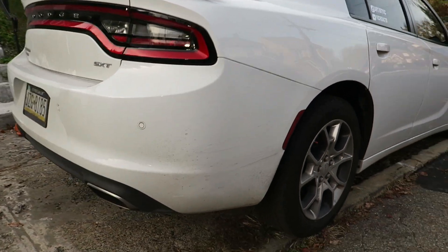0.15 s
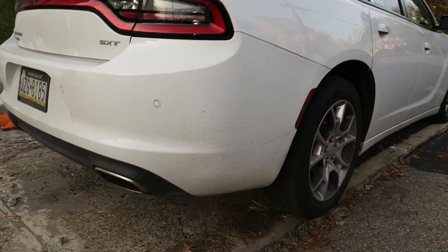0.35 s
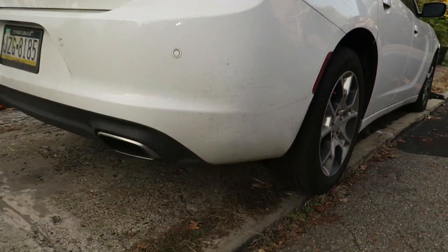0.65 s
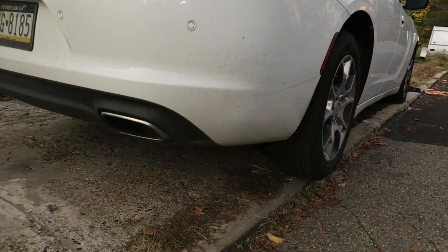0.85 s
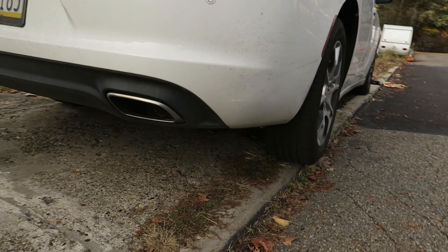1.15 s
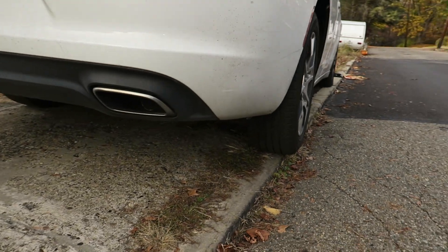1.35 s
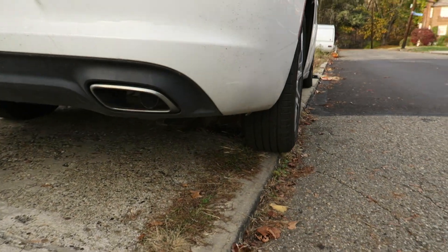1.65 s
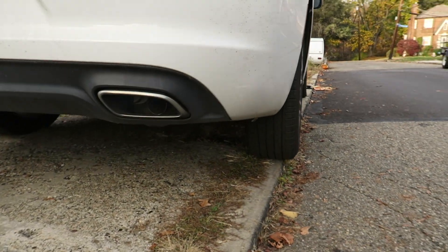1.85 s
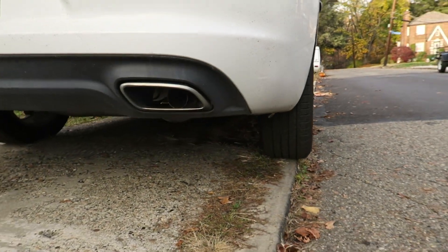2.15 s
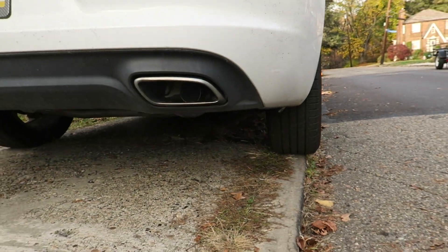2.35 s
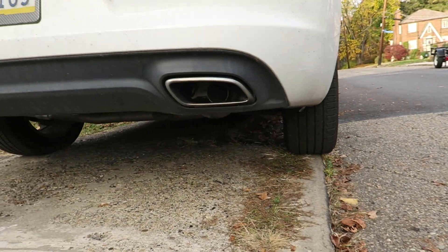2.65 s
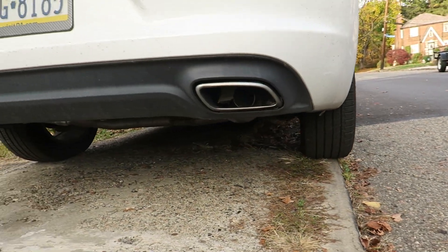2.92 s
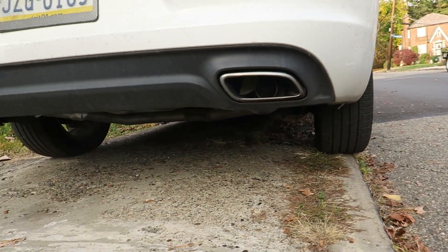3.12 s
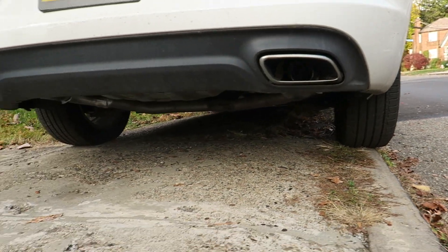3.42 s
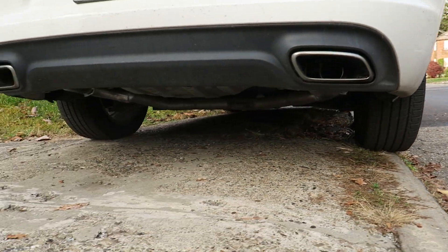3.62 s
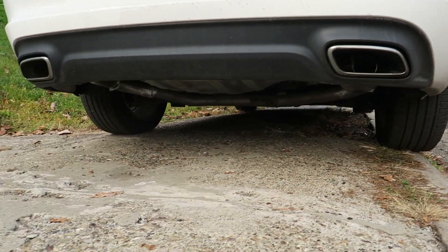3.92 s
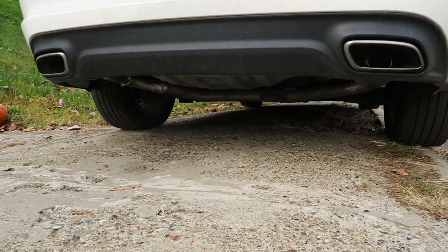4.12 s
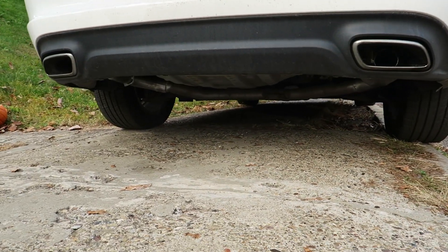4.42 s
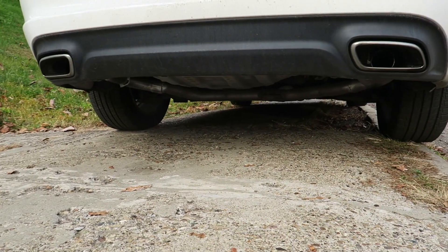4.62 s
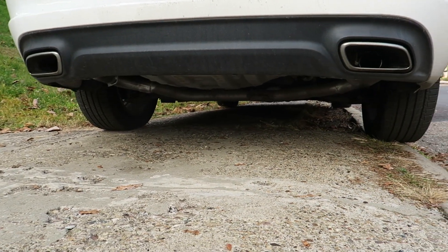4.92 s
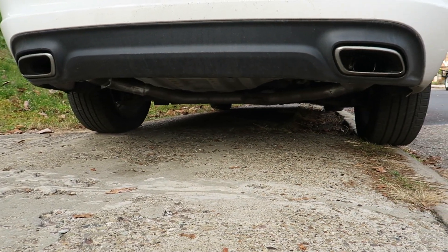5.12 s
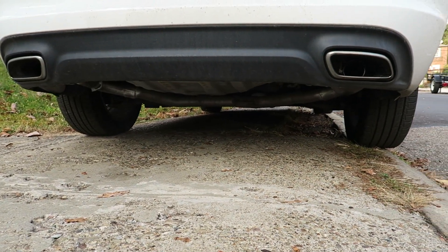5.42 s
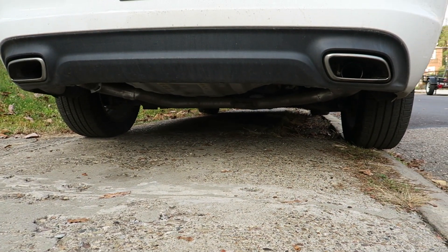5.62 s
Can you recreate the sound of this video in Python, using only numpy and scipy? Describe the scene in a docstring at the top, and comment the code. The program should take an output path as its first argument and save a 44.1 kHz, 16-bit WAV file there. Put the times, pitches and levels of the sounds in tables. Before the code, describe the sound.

A six-cylinder car engine is revved at the kerb, heard close behind its twin tailpipes. From a low idle drone it gives a small blip, then a bigger rev with a sharp bark. The engine winds down slowly with an uneven burble, blips once more and starts to climb again at the end. A soft hiss of gas and a faint whine run under the booming exhaust.

```python
"""At the kerb, close behind the twin tailpipes of a six-cylinder car that is revved again and again.
The engine makes tones at multiples of its firing rate; they boom as they cross the silencer's peaks.
Snaps of the throttle bark, and uneven firing burbles as the engine slows. Gas hisses out, belt-driven
parts whine along with the speed, and thin metal rings and ticks faintly."""
import sys
import numpy as np
from scipy import signal
from scipy.fft import rfft, irfft
from scipy.io import wavfile
from scipy.ndimage import uniform_filter1d

SR = 44100
rng = np.random.default_rng(int(sys.argv[2]) if len(sys.argv) > 2 else 0)


def file_out(sig):
    """Save sig as 16-bit WAV at sys.argv[1]."""
    # one column per channel
    cols = np.atleast_2d(sig).T
    # limit, then scale
    lim = np.clip(cols, -1, 1)
    pcm = np.round(lim * 32767).astype(np.int16)
    wavfile.write(sys.argv[1], SR, pcm)


N = 254456
TIME = np.arange(N) / SR
FREQS = np.fft.rfftfreq(N, 1 / SR)
RUSH_DB = -57.5  # base level of the hiss and the swelling bands

# engine speed as firings a second, six to one engine cycle: t/s, f/Hz
FIRING_RATE = [(0, 71.3), (.13, 68.4), (.35, 68.3), (.48, 73.7), (.545, 93.6), (.66, 96), (.8, 88.7),
               (.88, 82), (1.11, 77.5), (1.24, 87), (1.41, 133.8), (1.57, 142.5), (1.9, 121), (2.1, 111),
               (2.28, 100), (2.42, 97.8), (2.71, 93), (2.9, 97), (3.1, 96.6), (3.6, 81.6), (3.96, 74.7),
               (4.17, 72.6), (4.45, 98), (4.75, 84.7), (5.04, 79), (5.42, 76), (5.6, 82.4), (5.77, 87)]
# how hard the cylinders fire: t/s, level/dB
LOAD = [(0, 0.5), (.27, 7.5), (.45, 6), (.66, -1), (.97, -6.5), (1.12, -3), (1.27, 3.5), (1.5, 0),
        (1.68, -19.5), (2.0, -1.5), (2.2, -3), (2.45, 1.5), (3.42, 2.5), (3.7, -4), (3.93, 2), (4.33, 3.5),
        (4.5, -1.5), (4.72, -0.5), (4.93, -11), (5.25, -5), (5.45, -6), (5.77, 5.5)]
# moments when the firing falters: t/s, drop in load/dB
STUMBLES = [(.85, 9.5), (1.69, 2), (2.282, 8), (2.629, 4.5), (4.054, 8), (4.611, 6), (5.392, 5)]
# snaps of the throttle: start/s, end/s, extra push on the tones/dB, extra bark/dB
SNAPS = [(0.384, 0.426, 2, 8), (0.576, 0.659, 13.5, 7.5), (1.296, 1.319, 11, 20.5),
         (4.347, 4.447, 5.5, 5.5), (5.678, 5.771, 3.5, 0.5)]
# rise and fall of the rush of gas and machinery: t/s, level/dB
RUSH = [(0, -2), (.2, -3), (.43, 1.5), (.62, -2), (.8, -9), (1.15, -6), (1.32, 1.5), (1.48, -3), (2.0, 1),
        (2.39, 3), (2.52, -2), (3.2, -2), (3.95, 2), (4.2, 4), (4.48, -6), (5.4, -3), (5.77, 3)]
# how alike the noise is on the left and right: f/Hz, likeness (0-1)
LIKENESS = [(300, .93), (1000, .94), (2200, .98), (3500, .98), (5300, .85), (8000, .45), (12000, .25)]
# how the exhaust leans to the left: f/Hz, left minus right/dB, left lead/rad
LEFT_LEAN = [(110, -.6, .15), (200, .6, .28), (270, 2.2, .38), (350, 3.5, .42), (500, 2.2, .35),
             (700, 0, .2), (1000, 0, 0)]
# small ticks of metal: t/s, level/dB
TICKS = [(.843, -58), (4.178, -53), (4.201, -53)]
# narrow rings and broad patches of hiss: middle/s, half length/s, f/Hz, width/Hz, level over rush/dB
BANDS = [(0.055, 0.29, 3106, 42, -12), (1.47, .25, 2300, 50, -8.5), (1.95, 0.23, 3260, 45, -6),
         (1.57, 0.26, 3600, 80, -9), (2.3, 1.0, 4600, 1600, -8), (2.95, .5, 3516, 14, -9.5),
         (4.05, 0.2, 430, 26, 18), (4.12, .18, 4900, 1400, -7), (0.3, .35, 680, 90, 7),
         (2.1, .4, 590, 100, 12), (5.4, .35, 345, 45, 13), (5.2, .6, 3106, 70, -9), (5.3, .25, 428, 24, 18),
         (5.5, 1.6, 1250, 45, -2), (5, .5, 4900, 280, -9)]
# tone colour of the hiss: f/Hz, level/dB
HISS_COLOUR = [(900, -33.5), (1700, -2), (2100, -2), (3100, -1), (3450, -4.5), (4200, -7), (4750, -6),
               (5250, -7), (5700, -12), (7400, -15), (8500, -22.5), (11500, -25.5), (12600, -32.5)]
# thin metal ringing in the hiss: f/Hz, width/Hz, level/dB
METAL_PEAKS = [(2270, 20, 0.5), (2480, 22, -1), (2520, 22, 0.5), (3130, 42, -2), (3570, 22, 1),
               (3870, 40, 0.5), (4290, 27, 3.5), (4850, 30, 0.5), (5300, 30, -1)]
# belt-driven parts singing out: middle/s, half length/s, multiple of the firing rate, level/dB
WHINES = [(.42, .035, 12, -46), (.65, .1, 7.04, -47), (1.955, .125, 7.04, -44), (2.3, .14, 12, -59.5),
          (2.95, .25, 7.04, -56), (3.58, .2, 7.04, -46.5), (4.21, .06, 7.04, -48), (5.5, .4, 7.04, -55)]
# where the silencer rings when thumped: f/Hz, width/Hz, level/dB
SILENCER_PEAKS = [(38, 11, -16.5), (88, 2.8, 6), (172.4, 47, -0.5), (187.3, 62, -3)]
# spells of uneven firing: start/s, end/s, level/dB
BURBLES = [(0.494, 0.568, -25), (0.757, .94, -27.5), (1.317, 1.384, -18.5), (1.568, 1.661, -25.5),
           (1.749, 2.05, -26), (2.078, 2.323, -23.5), (2.353, 2.729, -29), (3.779, 4.622, -27),
           (5.138, 5.77, -31.5)]
# where the pipe rings: f/Hz, width/Hz, level/dB
PIPE_PEAKS = [(310.6, 36, 6.5), (383, 47, 2.5), (431.8, 20, 4.5), (501.8, 30, 5), (516, 41, 6),
              (610, 71, -4), (650, 250, -11.5)]
# tone colour of the sharp pulses at wide-open throttle: f/Hz, level/dB
BLAT_COLOUR = [(250, -14), (480, 6.5), (650, 10), (850, 0), (1100, 1), (1400, -20), (1950, -19.5),
               (2600, -29.5), (5000, -54)]
# tone colour of the swirling gas at the tailpipe: f/Hz, level/dB
BARK_COLOUR = [(450, -22), (680, 7.5), (760, -3.5), (830, 5), (920, -5), (1050, 2), (1110, -1), (1180, -1),
               (1240, 5), (1320, -3.5), (1450, -2.5), (1750, -14), (2500, -25), (5000, -43)]
# low engine tones; the half multiples come from the uneven beat of the two rows of cylinders:
# multiple of the firing rate, level/dB, dB per dB of load, dB per dB of push, waver (0-1)
LOW_TONES = [(1, 1, 1, 0.18, 0.12), (1.5, -18, 0.16, 0.27, 0.5), (2, -10, 1.26, 0.23, 0.14),
             (2.5, -19.5, 0.23, 0.7, .15), (3, -10.5, 1.34, 0.28, .07), (4, -20.5, 0.78, 0.89, .12),
             (5, -23.5, 0.2, 1, 0.3), (6, -24, 0.97, 0.7, 0.5)]
# how well the silencer and pipes let each pitch through: f/Hz, level/dB
EXHAUST_PASSAGE = [(66, -43), (76, -24.5), (87, -13.5), (97, -13), (108, -20.5), (136, -37), (149, -7),
                   (160, -3.5), (180, -17.5), (200, -14.5), (220, -32), (238, -42.5), (262, -24),
                   (278, -27), (292, -23), (318, -22), (345, -27), (375, -22.5), (402, -29), (432, -18.5),
                   (465, -28), (550, -28), (700, -36.5)]
# one row of cylinders briefly pulls harder: middle/s, half length/s, boost of the half multiples/dB
LIMP = (2.18, 0.13, 8)


def gain(db):
    """Turns decibels into a factor to multiply by."""
    return 10 ** (np.asarray(db) / 20)


def unit_level(x):
    """Scales a signal to an average (rms) level of 1."""
    return x / np.sqrt(np.mean(x ** 2) + 1e-20)


def steady(x, window=3000):
    """Holds the level near 1, smoothing over a window of samples."""
    return x / np.sqrt(uniform_filter1d(uniform_filter1d(x ** 2, window), window) + 1e-12)


def over_time(table):
    """Joins the points of a time table, giving a value for every sample."""
    return np.interp(TIME, *np.transpose(table))


def over_freq(table, column=1):
    """Joins the points of a frequency table, giving a value for every frequency."""
    table = np.asarray(table)
    return np.interp(np.log(FREQS + 1), np.log(table[:, 0]), table[:, column])


def resonances(peaks):
    """A filter that rings at each peak; neighbours alternate in sign, as along a pipe."""
    return sum((-1) ** k * gain(db) * 1j * FREQS * width / (hz ** 2 - FREQS ** 2 + 1j * FREQS * width)
               for k, (hz, width, db) in enumerate(peaks))


def lowpass(hz, order=4):
    """A filter that keeps what lies below hz."""
    return 1 / np.sqrt(1 + (FREQS / hz) ** (2 * order))


def filtered(x, response):
    """Sends a signal through a filter."""
    return irfft(rfft(x) * response, N)


def wander(hz):
    """A slow random wobble, up to about hz."""
    return unit_level(filtered(rng.standard_normal(N), lowpass(hz, order=2)))


def swell(middle, half_length):
    """A smooth rise to 1 and fall back."""
    return np.exp(-((TIME - middle) / half_length) ** 2)


def gas_noise(colour):
    """The noise of swirling gas in stereo; left and right are less alike in the treble."""
    shared, apart = rng.standard_normal((2, N))
    likeness = over_freq(LIKENESS)
    mid = filtered(shared, colour * np.sqrt(1 + likeness))
    side = filtered(apart, colour * np.sqrt(1 - likeness))
    return unit_level(np.array([mid + side, mid - side]))


def count_firings(flutter=.003):
    """Running count of firings; the engine never turns quite evenly."""
    return np.cumsum(over_time(FIRING_RATE) * (1 + flutter * wander(25))) / SR


def firing_clicks(firings):
    """One click at each firing."""
    return np.diff(np.floor(firings), prepend=0)


def speed_octaves():
    """Engine speed in octaves (doublings) above its average."""
    rate = over_time(FIRING_RATE)
    return np.log2(rate / rate.mean())


def load_db():
    """Strength of the firings, with their brief stumbles."""
    return over_time(LOAD) - sum(db * swell(t, half_length=.032) for t, db in STUMBLES)


def snaps_db(rise_s=.024, fall_s=.049):
    """Throttle snaps rise, hold and fade; gives their push on the tones and their extra bark."""
    push = blast = 0
    for start, end, push_db, blast_db in SNAPS:
        shape = np.exp(-np.maximum(start - TIME, 0) / rise_s - np.maximum(TIME - end, 0) / fall_s)
        push += push_db * shape
        blast += blast_db * shape
    return push, blast


def puffs(firings, depth, uneven):
    """Gas surges once a firing, and one row of cylinders blows harder than the other."""
    surge = depth * np.cos(2 * np.pi * firings)
    return unit_level(np.exp(surge + uneven * np.cos(np.pi * firings)))


def tone_stack(firings, multiples, odd_db, waver):
    """Wavering, out-of-step tones at multiples of half the firing rate; odd ones are weaker."""
    return sum(gain(odd_db * (k % 2)) * (1 + waver * wander(10)) * np.cos(np.pi * k * firings + k * k)
               for k in multiples)


def street_echo(x, level_db=-17, fade_s=.047):
    """The car's underside, kerb and house fronts scatter the sound, differently to each side."""
    tails = rng.standard_normal((2, N)) * gain(-60 * TIME / fade_s) * (TIME > .004)
    tails /= np.linalg.norm(tails, axis=1, keepdims=True)
    without_bass = filtered(x, 1 - lowpass(230))
    return gain(level_db) * signal.fftconvolve(without_bass[None], tails, axes=1)[:, :N]


def metal_ticks(fade_s=.00085):
    """Dry ticks of metal: tiny bursts of bright noise."""
    bursts = sum(gain(db) * (TIME >= t) * np.exp(-abs(TIME - t) / fade_s) for t, db in TICKS)
    return bursts * gas_noise(lowpass(8000, order=3) * (1 - lowpass(2500)))


def swelling_bands():
    """Narrow rings and broad patches of brighter hiss swell and fade."""
    out = np.zeros(N)
    for middle, half_length, hz, width, db in BANDS:
        band = steady(filtered(rng.standard_normal(N), resonances([(hz, width, 0)]) ** 2))
        out += gain(db) * swell(middle, half_length) * band
    return gain(RUSH_DB + over_time(RUSH)) * out


def gas_hiss(firings, metal_db=1.5, ripple_db=2.5):
    """Gas and machinery rush; thin metal adds a few strong peaks and many weak ripples."""
    ripple = rng.standard_normal(len(FREQS))
    ripple = unit_level(uniform_filter1d(uniform_filter1d(ripple, 120), 120))
    metal = np.hypot(1, gain(metal_db) * abs(resonances(METAL_PEAKS)))
    noise = gas_noise(gain(over_freq(HISS_COLOUR) + ripple_db * ripple) * metal)
    return gain(RUSH_DB + over_time(RUSH)) * noise * puffs(firings, depth=.049, uneven=.048)


def belt_whine(firings, waver=.3):
    """Parts spun by the belt sing now and then, their pitch following the engine speed."""
    tones = sum(gain(db) * swell(middle, half_length) * np.sin(2 * np.pi * multiple * firings)
                for middle, half_length, multiple, db in WHINES)
    return np.sqrt(2) * (1 + waver * wander(30)) * tones


def silencer_burble(firings, floor_db=-41, ramp_s=.073):
    """Firings of random strength thump the silencer, in spells and faintly in between."""
    kicks = firing_clicks(firings) * rng.uniform(-1, 1, N)
    thumps = filtered(kicks, resonances(SILENCER_PEAKS) * lowpass(260))
    spells = sum(gain(db) * np.clip(np.minimum(TIME - start, end - TIME) / ramp_s + .5, 0, 1)
                 for start, end, db in BURBLES)
    return np.hypot(gain(floor_db), spells) * steady(thumps, window=1100)


def pipe_rasp(firings, base_db=-41, flicker_db=2.7):
    """Middle tones and puffs of gas ring the pipe: cleaner under load, rough when coasting fast."""
    pipe = resonances(PIPE_PEAKS) * lowpass(980) * (1 - lowpass(120))
    tones = tone_stack(firings, [7, 9, 11, 13, 15, 16], odd_db=-4, waver=.35)
    tones = steady(filtered(tones, pipe), window=6000)
    gas = rng.standard_normal(N) * puffs(firings, depth=.094, uneven=.35)
    gas = steady(filtered(gas, pipe))
    load, octaves = load_db(), speed_octaves()
    push, _ = snaps_db()
    roughness = gain(12 * octaves - .3 * load - .9 * push)
    effort_db = .8 * over_time(RUSH) - .054 * load + 3 * octaves + .55 * push
    level = gain(base_db + effort_db + flicker_db * wander(19))
    return level * (tones + roughness * gas) / np.hypot(1, roughness)


def blat(firings, uneven=.2):
    """Each firing sends a sharp pressure pulse down the pipe, trailed by a spray of gas."""
    strength = 1 + .1 * rng.standard_normal(N) + uneven * np.cos(np.pi * firings)
    pulses = unit_level(firing_clicks(firings) * strength)
    spray = .45 * unit_level(rng.standard_normal(N) * np.exp(-(firings % 1) / .3))
    return steady(filtered(pulses + spray, gain(over_freq(BLAT_COLOUR))), window=2000)


def tailpipe_bark(firings, base_db=-53.5, tones_db=-7, blat_db=3):
    """Swirling gas and high tones leave the tailpipe; a throttle snap hardens them into a blat."""
    colour = gain(over_freq(BARK_COLOUR))
    gas = gas_noise(colour) * puffs(firings, depth=.21, uneven=.043)
    tones = tone_stack(firings, range(17, 37), odd_db=-10, waver=.85)
    tones = steady(filtered(tones, colour), window=6000)
    _, blast = snaps_db()
    hardness = np.clip(blast / 13, 0, .75)
    soft = np.sqrt(1 - hardness) * unit_level(gas + gain(tones_db) * tones)
    hard = np.sqrt(hardness) * gain(blat_db) * blat(firings)
    effort_db = .49 * over_time(RUSH) + .086 * load_db() + 6 * speed_octaves() + blast
    return gain(base_db + effort_db) * (soft + hard)


def exhaust_boom(firings, start_phase=1.83):
    """Low tones grow with load; the silencer changes their level and timing as their pitch sweeps."""
    phase_shift = .5 * np.unwrap(np.angle(resonances([(96, 10, 0)]) * resonances([(167, 13, 0)])))
    rate, load, passage = over_time(FIRING_RATE), load_db(), over_freq(EXHAUST_PASSAGE)
    push, _ = snaps_db()
    middle, half_length, boost_db = LIMP
    limp_db = boost_db * swell(middle, half_length)
    out = np.zeros(N)
    for multiple, db, by_load, by_push, waver in LOW_TONES:
        hz = multiple * rate
        engine_db = db + by_load * load + by_push * push + (multiple % 1 > 0) * limp_db
        level = gain(engine_db + np.interp(hz, FREQS, passage))
        phase = 2 * np.pi * multiple * firings + np.interp(hz, FREQS, phase_shift) + start_phase
        out += level * (1 + waver * wander(7.5)) * np.sqrt(2) * np.cos(phase)
    return out


def scene():
    """One firing count keeps the engine sounds in step; the low-middle tones lean to the left."""
    firings = count_firings()
    exhaust = exhaust_boom(firings) + silencer_burble(firings) + pipe_rasp(firings) + belt_whine(firings)
    lean = gain(over_freq(LEFT_LEAN) / 2) * np.exp(.5j * over_freq(LEFT_LEAN, column=2))
    stereo = np.array([filtered(exhaust, lean), filtered(exhaust, 1 / lean)]) + street_echo(exhaust)
    return stereo + tailpipe_bark(firings) + gas_hiss(firings) + swelling_bands() + metal_ticks()


def record(dry, fade_s=.005, top_hz=12600):
    """Fades both ends and cuts the highest treble."""
    fades = np.sin(np.pi / 2 * np.minimum(np.minimum(TIME, TIME[::-1]) / fade_s, 1)) ** 2
    treble_cut = signal.firwin(511, top_hz, window=("kaiser", 9), fs=SR)
    return signal.oaconvolve(dry * fades, treble_cut[None], "same")


dry = scene()
out = record(dry)
file_out(out)
```